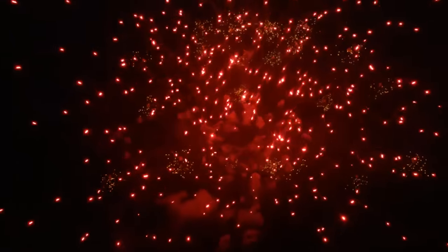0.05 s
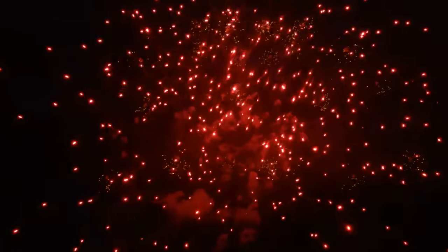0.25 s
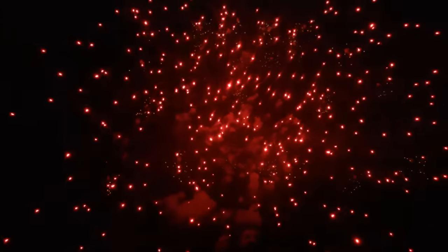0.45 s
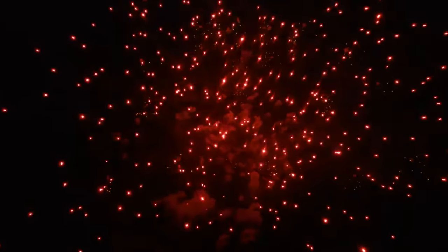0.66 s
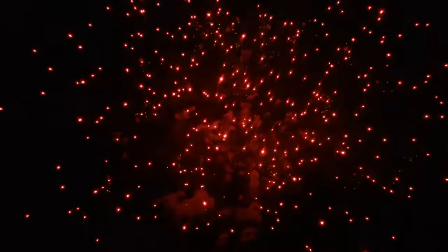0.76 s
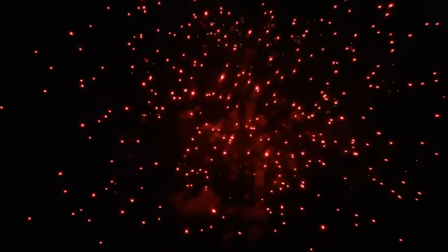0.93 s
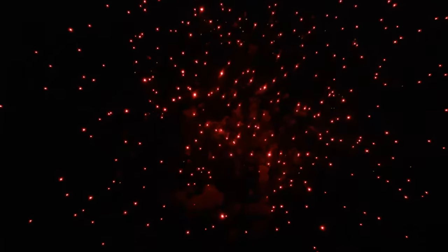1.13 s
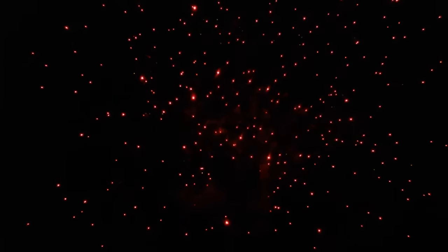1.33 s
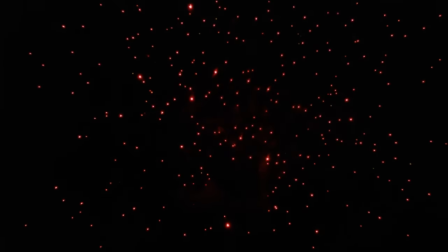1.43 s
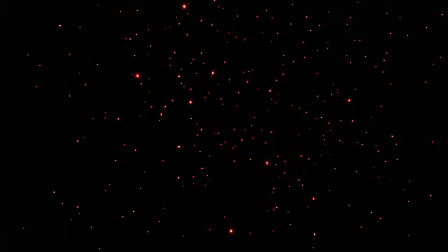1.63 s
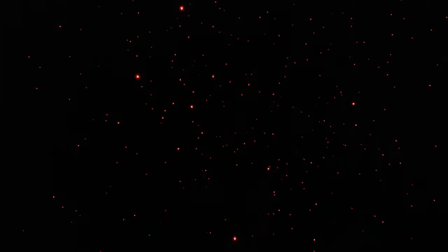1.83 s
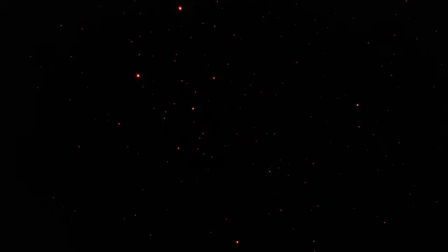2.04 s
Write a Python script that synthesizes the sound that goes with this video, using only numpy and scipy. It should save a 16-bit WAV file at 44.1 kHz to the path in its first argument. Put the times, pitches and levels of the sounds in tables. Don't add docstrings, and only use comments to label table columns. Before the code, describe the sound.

Firework salutes explode in a ragged rapid volley, then rumbling echoes sink and distant blasts swell

```python
import sys
import numpy as np
from scipy import signal
from scipy.io import wavfile

SR = 44100
rng = np.random.default_rng(int(sys.argv[2]) if len(sys.argv) > 2 else 0)


def to_wav(s):
    ch = np.atleast_2d(s).T
    pcm = np.round(np.clip(ch, -1, 1) * 32767)
    wavfile.write(sys.argv[1], SR, pcm.astype(np.int16))


def invert_db(level):
    return 10 ** (np.asarray(level, dtype=float) / 20)


N = 91551

# start in seconds, level in dB.
BLASTS = [(0.0132, 1.9), (0.073, 5), (0.076, 4.5), (0.0996, 1), (0.1035, -1.5), (0.1153, -1), (0.1624, 1),
          (0.19, 4.5), (0.1927, 4), (0.2107, 2.8), (0.2886, 1.5), (0.304, -3), (0.3115, 1.7), (0.3461, 1),
          (0.3666, 3), (0.3826, -0.5), (0.3884, 0), (0.4325, -1), (0.4502, -0.6), (0.4813, 0.2),
          (0.5115, 2.5), (0.5874, 1.5), (0.6638, 1.9)]
# start in seconds, level in dB, sharpness of the edge in dB.
SLAPS = [(0.0205, -3.5, -13), (0.0434, 3, 3), (0.0703, -3.5, 9.5), (0.1084, 0.5, -8), (0.1231, -3, -1),
         (0.1251, -1.5, 3), (0.1461, -2.5, 6), (0.1724, -8.5, 5), (0.1864, -1, 1), (0.2242, -2, 5),
         (0.241, -1.5, 9), (0.2667, -6.5, 3), (0.3187, -4.5, -9), (0.3395, -6, 9.5), (0.3757, -3, -10),
         (0.396, 2, 2), (0.41, -7.5, -10), (0.419, -4.3, 1), (0.4276, -5.5, -15), (0.474, -2.5, 0),
         (0.4936, -4.5, -10), (0.5353, -1.5, -5.5), (0.555, -5.5, 1.5), (0.61, -8.5, -13),
         (0.6151, -4.5, 3.5), (0.637, -12, 11), (0.6931, -5, -11), (0.7035, -8, -15.5), (0.714, -15, -9.0)]
# time in seconds, level in dB, brightness in dB per octave.
THUNDER = [(0, -28.5, 6), (.3, -24, -3.5), (.6, -21, -1.5), (.8, -24, 1.56), (.95, -24.5, 1),
           (1.1, -24.5, 0.4), (1.449, -25.5, -0.2), (1.6, -23.5, 0.1), (1.75, -20.5, -0.13),
           (1.88, -18, 0.12), (1.96, -16.5, -0.5), (2.03, -16, -0.5), (2.067, -15.5, 1)]

GRAINS_PER_S, GRAIN_SHARE = 1400, 0.75


def rms_one(x):
    return x / np.sqrt(np.mean(x ** 2) + 1e-20)


def butter(x, hz, kind, order=2):
    return signal.sosfilt(signal.butter(order, hz, kind, fs=SR, output="sos"), x)


def train(s, db):
    out = np.zeros(N)
    np.add.at(out, (np.asarray(s) * SR).astype(int), invert_db(np.asarray(db)))
    return out


def drift(rate_hz):
    r = np.exp(-2 * np.pi * rate_hz / SR)
    wander = signal.lfilter([1], [1, -2 * r, r * r], rng.standard_normal(N + SR))
    return rms_one(wander[SR:])


def random_sizes(spread_db):
    return invert_db(spread_db * np.minimum(rng.exponential(1, N), 4))


def coloured(spectrum, tilt_db, patchy_db, grain=0):
    together = drift(14)
    edges = 25 * 2 ** (np.arange(29) / 3)
    hz, db = np.transpose(spectrum)
    white = rng.standard_normal((2, N))
    sizes = random_sizes(4.0) * rng.choice([-1, 1], N)
    grains = rms_one(sizes * (rng.random(N) < GRAINS_PER_S / SR))
    white = np.sqrt(1 - grain) * white + np.sqrt(grain) * grains
    out = 0
    for k, (low, high) in enumerate(zip(edges, edges[1:])):
        mid = np.sqrt(low * high)
        level = np.interp(np.log(mid), np.log(hz), db) + tilt_db * np.log2(mid / 300)
        flicker = patchy_db * (together + 0.65 * drift(8.7))
        out = out + invert_db(level + flicker) * butter(white[k % 2], [low, high], "band")
    return rms_one(out)


def blast_wave():
    # delay in seconds, share, rise in seconds, stretch in time.
    bounces = [
        (.0035, 0.43, 0.0002, 3.7),
        (.011, 0.25, 0.0012, 0.64),
    ]
    push_s, fall = 0.0013, 0.45
    low_cut_hz, low_cut_q = 141.2, 2.51
    t = np.arange(int(0.06 * SR)) / SR
    wave = 0
    for lag, share, rise, stretch in [(0, 1, 1e-6, 1), *bounces]:
        u = np.maximum(t - lag, 0) + 1e-6 * (lag == 0)
        pushes = u / push_s / stretch
        wave = wave - share * np.minimum(u / rise, 1) * (1 - pushes) * np.exp(-fall * pushes)
    w = 2 * np.pi * low_cut_hz / SR
    c, a = np.cos(w), np.sin(w) / 2 / low_cut_q
    return signal.lfilter([(1 + c) / 2, -1 - c, (1 + c) / 2], [1 + a, -2 * c, 1 - a], wave)


def heard(clicks):
    return signal.fftconvolve(clicks, blast_wave())[:N]


def thunder_course():
    s, db, tilt = np.transpose(THUNDER)
    t = np.arange(N) / SR
    return np.interp(t, s, db), np.interp(t, s, tilt)


def thunder():
    # frequency in Hz, level in dB.
    roll_colour = [(30, -25.5), (100, -6.5), (220, -3), (355, -16), (515, -10.5), (700, -18.5),
                   (2100, -21.5), (3200, -34.5)]
    far_per_s, far_cut_hz, far_db = 200, 1300, -8
    roll_cut_hz, roll_db = 2860, 1.5
    db, tilt = thunder_course()
    far_clicks = random_sizes(2.0) * (rng.random(N) < far_per_s / SR)
    far = butter(heard(far_clicks), far_cut_hz, "low", order=4)
    roll = butter(coloured(roll_colour, tilt, 0, GRAIN_SHARE / 2), roll_cut_hz, "low")
    return invert_db(db) * (invert_db(roll_db) * roll + invert_db(far_db) * rms_one(far))


def stars():
    # frequency in Hz, level in dB per Hz.
    hiss_colour = [(1500, -8), (3000, -1.5), (4500, 3.5), (6000, -8), (7500, -16.5), (10000, -25),
                   (15000, -48)]
    hiss_db, follow = -46, 0.4
    db, _ = thunder_course()
    hiss = butter(coloured(hiss_colour, 0, patchy_db=1.5), [1500, 7700], "band", order=3)
    return invert_db(hiss_db + follow * (db - db.min())) * hiss


def blasts():
    dulled = [.103, .388, .433]
    front_hz, dull_db = 4500, -19
    s, db = np.transpose(BLASTS)
    far = np.abs(s[:, None] - dulled).min(axis=1) < 0.002
    near = heard(train(s[~far], db[~far]))
    whole = heard(train(s[far], db[far]))
    soft = butter(whole, front_hz, "low")
    return near + soft + invert_db(dull_db) * (whole - soft)


def scatter(clicks):
    # frequency in Hz, level in dB.
    scatter_colour = [(400, -4.5), (800, -10.5), (1700, -10.5), (3500, -14.5), (6500, -22), (10000, -36),
                      (15000, -38.5)]
    early_db = -22
    burst_db, lag_s, rise_s, burst_t60_s = -17.5, 0.0053, 0.0019, 0.036
    late_db, late_t60_s = -29, 0.53
    t = np.arange(SR) / SR
    u = np.maximum(t - lag_s, 0)
    fringe = invert_db(2 * early_db) * (u == 0)
    burst = invert_db(2 * burst_db - 120 * u / burst_t60_s) * (1 - np.exp(-u / rise_s))
    wash = invert_db(2 * late_db - 120 * t / late_t60_s)
    power = signal.fftconvolve(clicks ** 2, fringe + burst + wash)[:N]
    return np.sqrt(np.abs(power)) * coloured(scatter_colour, 0, 1.0, GRAIN_SHARE)


def slaps():
    cut_hz, edge_hz = 4300, 1100
    facet_s, facet_db = 0.001193, -7
    s, db, edge_db = np.transpose(SLAPS)
    draw = rng.random((len(s), 4))
    edges = train(s, db + edge_db - 4.0) - train(s, db - 6.5)
    for k, sign in enumerate([-1, 1]):
        arrival = s + facet_s * (k + draw[:, k] + 0.31)
        level = db + edge_db + facet_db - 6 * draw[:, k + 2]
        edges = edges + sign * train(arrival, level)
    body = heard(train(s, db - 3.0))
    sharp = butter(heard(edges), edge_hz, "high")
    return butter(body + sharp, cut_hz, "low", order=4)


def barrage():
    # start in seconds, level in dB.
    far_blasts = [(1.7221, -10), (1.8304, -14.5), (1.878, -21), (1.8943, -3.5), (1.9185, -2.5),
                  (1.982, -32), (1.9872, -5.5), (2.0146, -4.0), (2.0207, -1), (2.0337, -4), (2.0433, -7.5),
                  (2.0584, -11.5), (2.071, -0.5)]
    clicks = train(*np.transpose(far_blasts))
    return invert_db(-3.5) * butter(heard(clicks), 1440, "low", order=3)


def crackle():
    snap_band = [1800, 4400]
    start_s, rise_s, level_db = 2.035, 0.025, -32
    rise = np.clip((np.arange(N) / SR - start_s) / rise_s, 0, 1)
    snaps = rng.standard_normal(N) * (rng.random(N) < GRAINS_PER_S / SR)
    return invert_db(level_db) * rise * rms_one(butter(snaps, snap_band, "band", order=3))


def scene():
    direct = train(*np.transpose(BLASTS))
    echoes = train(*np.transpose(SLAPS)[:2])
    background = thunder() + stars()
    volley = blasts() + scatter(direct + 0.52 * echoes) + slaps()
    return (background + volley + barrage() + crackle())[None]


def starve(x):
    from_hz, band_hz = 7100, 380
    faint_db, under_db = -83, 52.25
    hz, _, z = signal.stft(x, SR, nperseg=2048)
    loudest = np.abs(z).max(axis=1, keepdims=True) ** 2
    bar = invert_db(2 * faint_db) + loudest * invert_db(-2 * under_db)
    for low in np.arange(from_hz, SR / 2, band_hz):
        band = (hz >= low) & (hz < low + band_hz)
        z[:, band] *= np.mean(np.abs(z[:, band]) ** 2, axis=1, keepdims=True) > bar
    return signal.istft(z, SR, nperseg=2048)[1][:, :N]


def roll_off(x):
    return signal.sosfilt(signal.butter(12, 15920, fs=SR, output="sos"), x)


def record(dry):
    top, ceiling, end_s = 1.3, 0.96, 0.0015
    top_cut = signal.cheby2(12, 70, 16500, fs=SR, output="sos")
    x = signal.sosfilt(top_cut, butter(dry, 35, "high"))
    x = np.clip(top * np.tanh(x / top), -ceiling, ceiling)
    x = x * np.minimum(np.arange(N)[::-1] / SR / end_s, 1)
    x = starve(signal.sosfiltfilt(top_cut, x))
    return roll_off(x)


dry = scene()
out = record(dry)
to_wav(out)
```